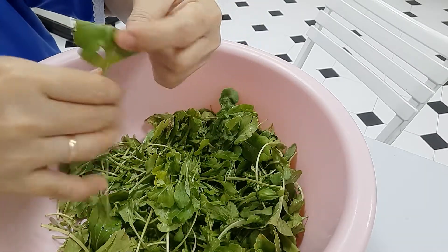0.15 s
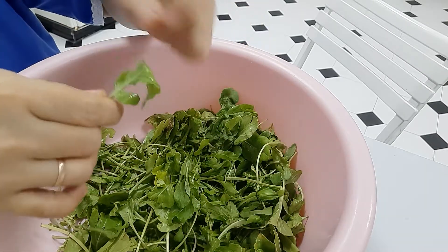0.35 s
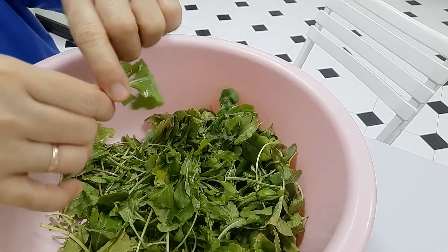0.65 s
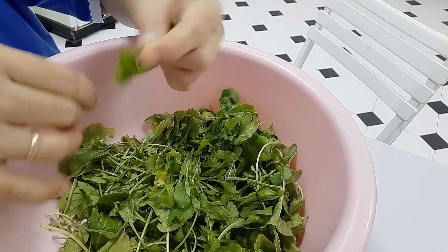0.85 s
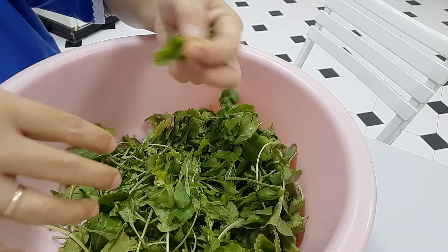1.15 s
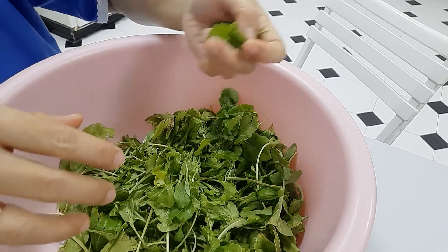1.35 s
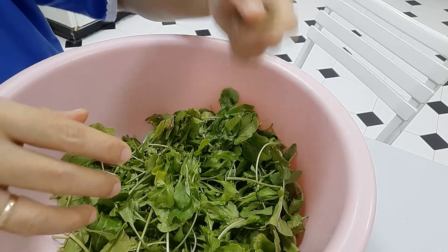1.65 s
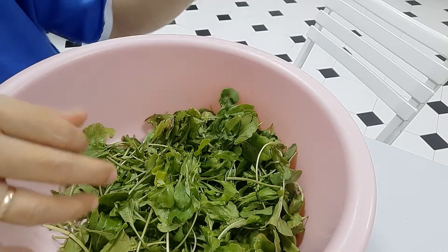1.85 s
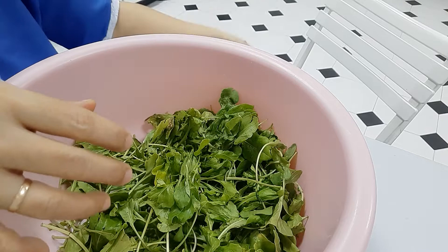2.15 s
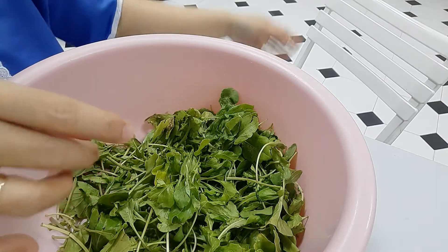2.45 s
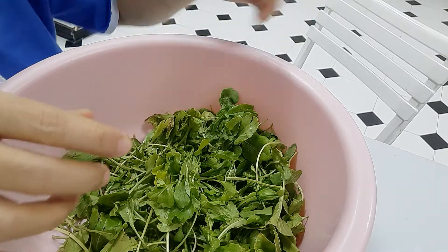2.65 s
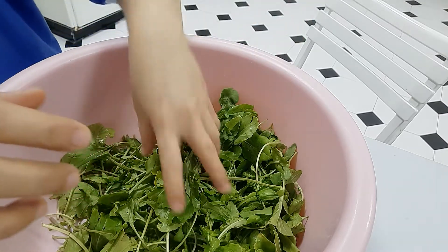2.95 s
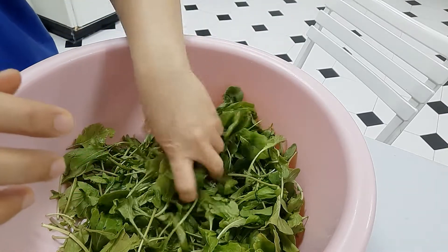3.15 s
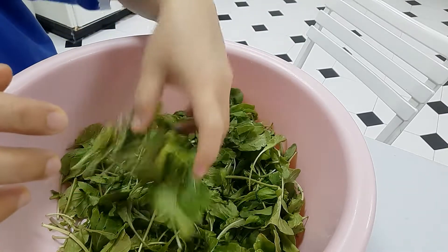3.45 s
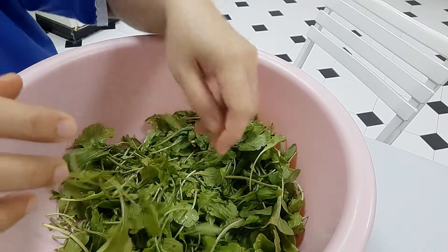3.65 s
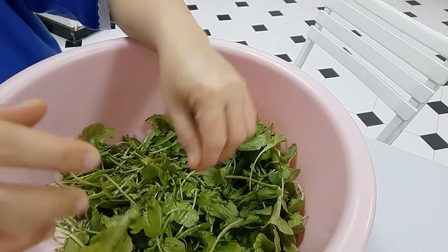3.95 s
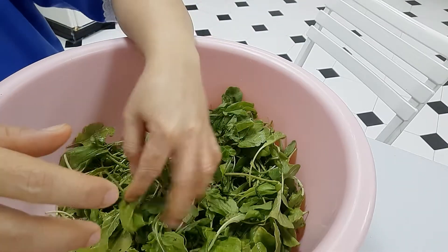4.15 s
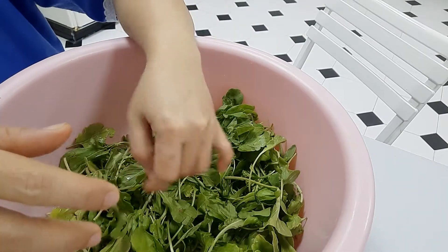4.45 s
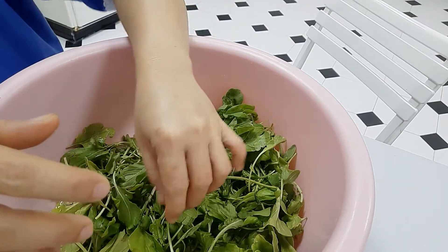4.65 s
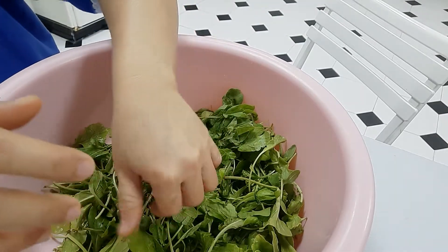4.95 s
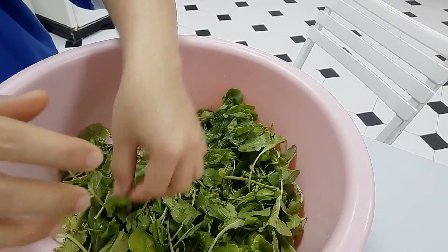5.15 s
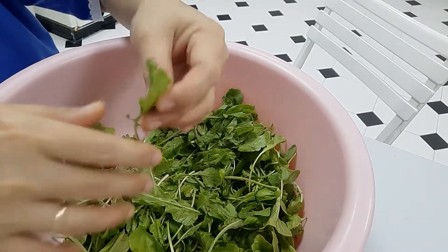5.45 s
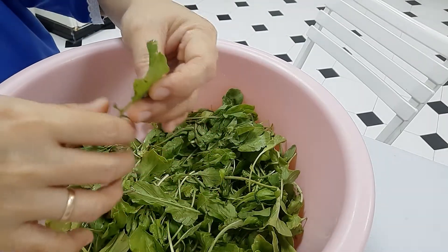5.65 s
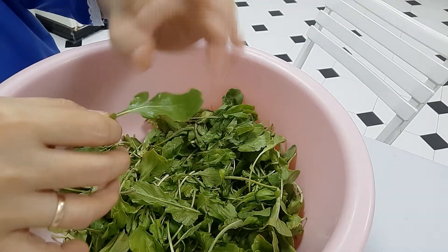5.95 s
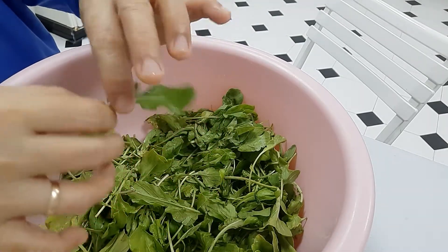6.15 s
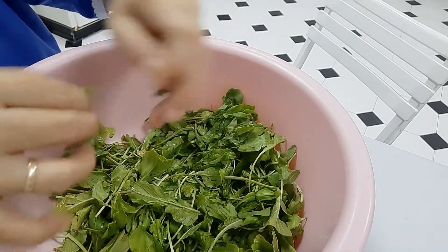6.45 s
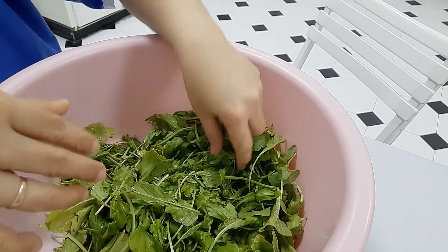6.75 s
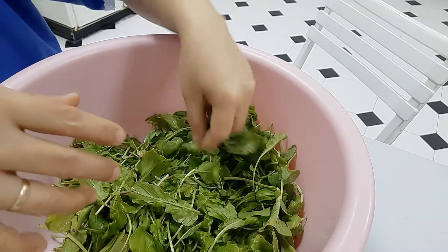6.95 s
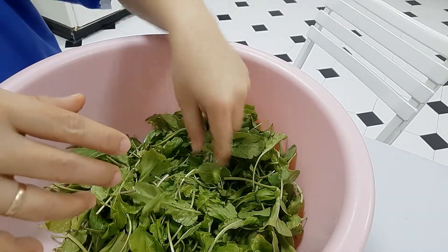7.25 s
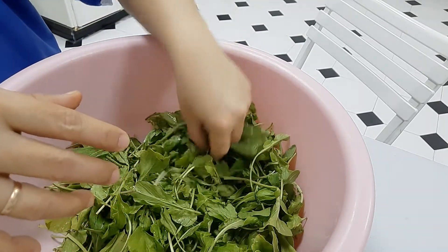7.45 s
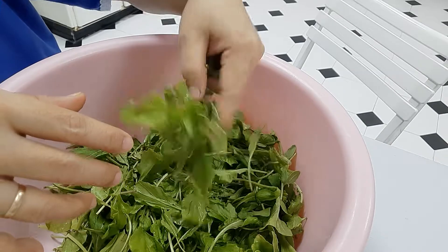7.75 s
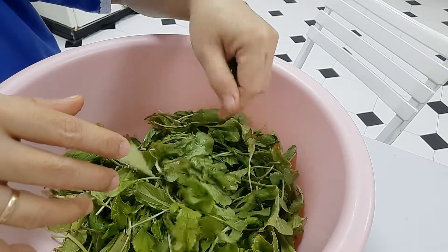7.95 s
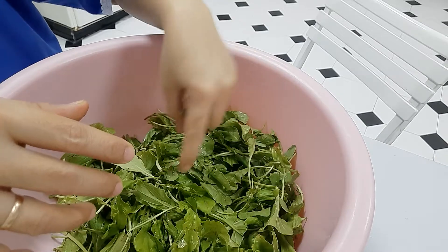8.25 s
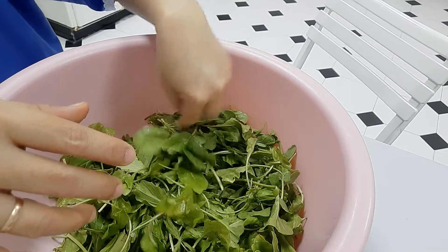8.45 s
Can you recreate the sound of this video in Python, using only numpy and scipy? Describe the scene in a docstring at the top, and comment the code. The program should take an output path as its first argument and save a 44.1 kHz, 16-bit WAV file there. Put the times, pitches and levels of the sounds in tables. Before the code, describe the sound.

A tiled room with short bright echoes, heard by two close microphones, the leaves nearer the left. Throughout, soft street rumble and a deep motor hum swell and sink, with tyre hiss strongest around 2.3-3.1 s. A low engine tone climbs briefly from 0.1 s; another pulls away from 2 to 4.3 s, rising and weakening. Handling is faint at first, with tiny ticks at 0.25 s and one sharp stem break at 0.76 s. From 3 to 3.7 s leaves rustle in a crisp, crackling surge, with another stroke at 4.2 s. At 4.43 s something heavy thuds dully on the floor, with quick weaker bounces to 4.6 s. Only slight rustles and ticks follow, until two loud, bright stem breaks almost together near 6.4 s. A rustle bursts at 6.9 s, then thick strokes with small snaps run from 7.4 to 8 s, and again at 8.4 s, until the end at 8.6 s.

```python
"""From the start a motor hums and street rumble comes into a tiled room: faint noise with swelling bands.
Two engines pull away, one at once and one at 2 s: rising sines. Meanwhile a hand close to two microphones
turns leafy greens in a plastic basin: dense noise grains rustle and crackle, stems snap as short bursts.
The rustle surges at 3 s; at 4.4 s something heavy thuds on the floor, as decaying modes, and bounces.
After a calmer stretch, two stems break loudly at 6.4 s, and the rustle is thick again from 6.9 s."""
import sys
import numpy as np
from scipy import signal
from scipy.io import wavfile
from scipy.ndimage import uniform_filter1d

SR = 44100
rng = np.random.default_rng(int(sys.argv[2]) if len(sys.argv) > 2 else 0)


def unload_audio(sound):
    """Save the sound as a 16-bit wav file, at the path given as the first command line argument."""
    columns = np.transpose(np.atleast_2d(sound))
    # keep every value between -1 and 1, then stretch to whole-number steps
    steps = np.round(np.clip(columns, -1, 1) * 32767)
    wavfile.write(sys.argv[1], SR, steps.astype(np.int16))


N = 379260

# Street spectrum. Each row: frequency in Hz, relative density in dB.
STREET_COLOUR = [(36, -32), (46, 1), (65, -2.5), (190, -8.5), (430, -20), (1150, -26.5), (1450, -32.5),
                 (2900, -49), (3700, -58), (6700, -64), (9800, -58), (10400, -54), (12200, -58),
                 (16000, -56)]
# Resonant humps on the street spectrum. Each row: centre in Hz, width in Hz, height in dB.
STREET_HUMPS = [(71.6, 7.7, 3), (127.5, 2.9, 9), (150.4, 7.5, 2), (190, 7.2, 3), (277.2, 24.4, 8),
                (571, 45, 6.5), (807, 17, 5), (1011, 15, 4), (11450, 90, 12)]
# Passing traffic. Each row: time in seconds, change of rumble in dB, of tyre roar in dB, of tyre hiss in dB.
TRAFFIC_SWELLS = [(0, 0, 3, 1.5), (.8, -0.5, 4, 1), (1.3, 0, 4, 5), (1.8, -0.5, 5, 5), (2.3, 0, 6, 8.5),
                  (2.7, 1, 5.5, 9), (3.1, 1, 5, 9), (3.8, -1, 6, 6), (4.6, 0.5, 5, 3), (5.1, -1.5, 4, 1.5),
                  (5.7, 0, 2, 1), (6.3, 1.5, 4, -1), (7, 0.5, 2.5, 3.5), (7.8, -2, 4.5, 0),
                  (8.6, 0, 4.5, 0)]
# Likeness of the street in both microphones. Each row: frequency in Hz, likeness from 0 to 1.
STREET_LIKENESS = [(60, 0.97), (130, 0.94), (290, 0.77), (640, 0.62), (1400, 0.45), (3000, 0.035),
                   (8000, 0.067), (15000, 0.26)]
# Phase of the street. Each row: frequency in Hz, lead of the left in radians.
STREET_LEFT_LEAD = [(60, .05), (600, 0.32), (1300, 3.07), (2800, 6), (16000, 28.4)]
# Balance of the street. Each row: frequency in Hz, left over right in dB.
STREET_BALANCE = [(60, 2.5), (180, 2.5), (550, 3.5), (1650, 3.5), (4970, 6), (15000, 3.5)]
STREET_DB = -45.5  # rms

# Motor hum swelling and sinking. Each row: time in seconds, tone rms in dB, octave rms in dB.
HUM_LEVELS = [(0, -44.5, -47), (.3, -45.5, -51), (1, -51, -48), (1.3, -46.5, -57), (2.15, -41.5, -47),
              (2.45, -42, -62), (2.8, -49, -47.5), (3.3, -53, -54), (3.7, -43.5, -49.5), (4.3, -43, -49.5),
              (5.1, -48, -61.5), (5.55, -54, -55), (5.8, -40.5, -60), (6.05, -47.5, -52),
              (6.45, -38.5, -46.5), (6.9, -41.5, -54), (7.1, -50.5, -52), (7.35, -55.5, -52.5),
              (7.95, -42.5, -55.5), (8.6, -44, -51.5)]
HUM_HZ = 47.75

# Engines pulling away. Each row: start in seconds, length in seconds, start pitch in Hz, climb in Hz per s,
# starting rms before the fade-in in dB, decline in dB per s.
ENGINE_RUNS = [(.1, .75, 57.6, 6.5, -44, 1), (1.955, 2.4, 53.58, 3.9, -39.5, 3.2)]
ENGINE_FADE_S = 0.16

# Reverberation of the tiled room. Each row: frequency in Hz, time to fall 60 dB in seconds.
ROOM_T60 = [(100, 0.37), (500, 0.69), (2000, 0.94), (5300, 0.51), (10000, 0.51), (15000, 0.4)]

# Modes of the floor. Each row: frequency in Hz, level in dB, time to fall 60 dB in seconds,
# arrival after the blow in seconds, rise time constant in seconds.
FLOOR_MODES = [(85, -20.5, 0.085, .0102, 0.0018), (107.6, -16, 0.18, 0.00195, 0.0071),
               (141, -25, 0.088, 0.0047, .004), (184.4, -16, 0.063, 0.0074, 0.0056),
               (225, -27.5, 0.14, 0.0023, .002), (275, -20, 0.066, 0.0022, 0.0009),
               (350, -30, 0.075, 0.0011, 0.00088), (402, -32, 0.099, 0.00065, 0.0017),
               (484, -29.5, 0.083, 0.00238, 0.00052), (736, -46, 0.079, 0.00092, .001)]
# Blow, second crack and two bounces. Each row: time in seconds, gain of the modes in dB, peak of the crack in dB.
FLOOR_BLOWS = [(4.426, -1, -32), (4.434, -30, -43), (4.4757, -10.5, -57), (4.567, -18.5, -54)]

# Snapping stems and stiff leaves. Each row: time in seconds, fibre level in dB, stem pitch in Hz,
# stem peak in dB, left over right in dB, length of the tear in seconds.
STEM_SNAPS = [(0.235, -59, 3360, -58, 11, 0.0022), (0.251, -61, 6500, -64, 9, 0.003),
              (0.264, -49, 6720, -64, 7, 0.0022), (0.6673, -77, 3360, -72, 7, 0.002),
              (0.7303, -63, 7900, -76, 6, 0.001), (0.7568, -24.5, 7410, -33.5, 2.5, 0.0062),
              (0.9334, -69, 7920, -53, 3, 0.002), (1.0728, -55.5, 3200, -51, 19, 0.0025),
              (1.1114, -67, 2070, -55, 15, 0.0022), (1.1438, -63, 5080, -66, 14, 0.002),
              (1.3555, -66, 2660, -71, 15, 0.0019), (1.7905, -75, 3830, -68, 7, 0.003),
              (3.1725, -52, 1720, -59, 9, 0.0021), (3.1843, -58, 5130, -48, 4, 0.002),
              (3.2385, -42, 6000, -43, 4, 0.0016), (3.481, -61, 3760, -48, 13, 0.0022),
              (3.5462, -58, 7640, -46, 12, 0.002), (3.6505, -65, 3530, -53, 12, 0.002),
              (4.216, -47.5, 1880, -50, 15, 0.0021), (5.262, -73, 7894, -70, 8, 0.002),
              (5.2738, -73, 5770, -56, 12, 0.0025), (5.288, -69, 7010, -70, 6, 0.0026),
              (5.8571, -73, 6970, -59, 15, 0.0028), (5.873, -75, 5700, -58.5, 18, 0.004),
              (5.884, -75, 5513, -66, 8, 0.004), (6.2852, -62, 7920, -71, 5, 0.0016),
              (6.3055, -64, 1700, -66, 7, 0.002), (6.373, -27, 8400, -33.5, 8, 0.0035),
              (6.395, -27.5, 6600, -37.5, 3, 0.006), (6.5878, -79, 5900, -56.5, 15, 0.0028),
              (6.705, -62, 1727, -68, 6, 0.0026), (6.8616, -58, 2760, -58, 11, 0.0024),
              (6.877, -46, 7100, -53, 11, 0.0026), (6.884, -47, 9000, -56, 10, 0.002),
              (7.0993, -66, 2400, -71, 16, 0.002), (7.251, -72, 2070, -67, 12, 0.0024),
              (7.428, -52, 1720, -49, 15, 0.002), (7.453, -46, 7400, -59, 10, 0.0049),
              (7.4573, -45, 7090, -46, 8, 0.0017), (7.4743, -40, 7080, -47, 4, 0.0026),
              (7.6059, -64, 3450, -51, 15, 0.0023), (7.699, -70, 1870, -51.5, 23, 0.0019),
              (7.7046, -72, 2000, -57, 10, 0.0024), (7.922, -56, 2150, -50, 14, 0.0022),
              (7.9414, -52, 2760, -52, 16, 0.002), (7.954, -61, 6230, -47, 2, 0.0023),
              (8.0086, -67, 3936, -52, 13, 0.0021), (8.3774, -48, 6800, -58, 14, 0.0013)]
# Fibre spectrum of whole stems breaking. Each row: frequency in Hz, relative density in dB.
BREAK_COLOUR = [(1000, -26), (2000, -20), (3800, -33), (5000, -32), (7340, -26), (9320, -15), (10600, -11),
                (11700, -9), (13700, -2.5), (16000, -8.5)]
# Fibre spectrum of lighter snaps. Each row: frequency in Hz, relative density in dB.
TICK_COLOUR = [(1500, -34), (4000, -14), (7000, -4), (10000, -4), (13000, 1), (16000, -12.5)]
STEM_BREAK_DB = -35  # fibres above this: a whole stem breaks
BOUNCE_S, BOUNCE_DB = 0.015, -26  # first echo of the snaps from the tiles

# Strokes of the hand in the leaves. Each row: peak time in seconds, peak level in dB, rise in seconds,
# fade in seconds, brightness in dB, left over right in dB.
HAND_STROKES = [(.238, -66, .008, .06, -6, 6), (.266, -66, .04, 0.18, -2, 7),
                (1.072, -65, .01, 0.28, -0.5, 3.5), (1.36, -81.5, 0.11, 0.81, 6.5, 3),
                (1.56, -80, 0.22, 0.16, 3, 7), (1.8, -76.5, .15, 0.38, 4, 7),
                (2.2, -78.5, 0.75, 0.24, -2, 2), (2.34, -67, 0.12, 0.37, 1.5, 1),
                (2.9, -79.5, 1.7, 1.1, -16, 3), (3.11, -52, 0.12, 0.38, 1.5, 4),
                (3.19, -60, 0.079, 0.22, 6, -2), (3.3, -56.5, 0.1, 0.14, 0, 1),
                (3.39, -61, 0.17, 0.16, 5, 3), (3.49, -62, 0.058, .06, -15, -2),
                (3.575, -52, 0.11, 0.2, -1, 4), (4.15, -75.5, .05, .8, -2, 6),
                (4.224, -54.5, 0.029, 0.27, 3, 3), (4.3, -63.5, .1, .2, -3, 2),
                (4.44, -65.5, .05, 0.28, -6, 0), (4.764, -84, .3, 0.18, 8.5, 3),
                (5.12, -80, .08, 1.1, 0, 3), (5.277, -68, 0.054, 0.099, 0, 5.5),
                (5.419, -78, .1, 0.075, 4.5, 3.5), (5.865, -72.5, 0.061, .25, -1, 1),
                (6.585, -74, 0.21, .15, 5, 3), (6.75, -80.5, 0.98, .9, 3.5, 3),
                (6.882, -55, 0.063, .08, -0.5, 5), (6.915, -60.5, 0.043, 0.061, 4.5, 6),
                (7.12, -76, 0.045, 0.12, 12, 5), (7.27, -80.5, 0.091, 0.11, 13, 4),
                (7.42, -55.5, 0.13, 0.11, 2.5, 4.5), (7.485, -57.5, 0.11, .4, -2, 3.5),
                (7.6, -61.5, .2, 0.31, 2, 4), (7.74, -69, .15, 0.071, 2, 4), (7.9, -59, 0.22, 0.21, 5, 4.5),
                (7.95, -59, 0.11, .07, -7, 3), (8.01, -65, .02, 0.078, -3, 2),
                (8.391, -56.5, 0.053, 0.22, 3, 3.5), (8.52, -69, 0.14, 0.25, 1, 4)]
STROKE_SWING_DB = 30  # climb within the rise, drop within the fade
SETTLING_DB = -89.5  # the heap keeps settling faintly between strokes
# Leaf spectrum. Each row: frequency in Hz, relative density in dB.
LEAF_COLOUR = [(500, -14), (1000, -7.5), (1600, -8), (2500, -13), (4000, -14.5), (6000, -14.5), (9000, -15),
               (12000, -17), (14000, -17), (16000, -25)]
# Parts of the heap. Each entry: delay to the right microphone in seconds.
HEAP_GAPS_S = [0.00017, .00026, .00042]

MIC_GAP_S = 0.00025  # sound from the left reaches the right microphone later
SHADE_DB = -14.5  # the right microphone faces away: top treble loss of leaves and snaps
EDGE_HZ = 15800


def amp(db):
    """Decibels to amplitude."""
    return 10 ** (np.asarray(db) / 20)


def evened(x):
    """Scales to unit rms."""
    return x / np.sqrt(np.mean(x ** 2) + 1e-20)


def read(points, hz):
    """Value of a frequency table at hz, interpolated over log frequency."""
    f, value = np.transpose(points)
    return np.interp(np.log(hz + 1), np.log(f + 1), value)


def follow(rows, t):
    """Columns of a time table at the times t."""
    s, *columns = np.transpose(rows)
    return [np.interp(t, s, c) for c in columns]


def colour(x, points):
    """Causal minimum-phase filter of unit energy with the given spectrum."""
    db = np.maximum(read(points, abs(np.fft.fftfreq(4096, 1 / SR))), -100)
    phase = -signal.hilbert(db * np.log(10) / 20).imag
    kernel = np.fft.ifft(amp(db) * np.exp(1j * phase)).real[:2048]
    return signal.oaconvolve(x, kernel[None] / np.linalg.norm(kernel), axes=1)[:, :N]


def band(x, low_hz, high_hz):
    """Band-pass."""
    return signal.sosfilt(signal.butter(2, [low_hz, high_hz], "bandpass", fs=SR, output="sos"), x)


def tilt(x, bright_db, split_hz):
    """Raises or lowers what lies above the split."""
    low = signal.sosfilt(signal.butter(2, split_hz, fs=SR, output="sos"), x)
    return low + amp(bright_db) * (x - low)


def placed(x, pan_db, gap_s=MIC_GAP_S):
    """Two microphones: a level difference and a later arrival on the right."""
    late = np.concatenate([np.zeros(round(gap_s * SR)), x])[:len(x)]
    return np.array([x * amp(pan_db / 2), late * amp(-pan_db / 2)])


def street():
    """Random short-time spectra: rumble, tyre roar and hiss swell apart, over fixed humps."""
    frames, hz = N // 1024 + 5, np.fft.rfftfreq(4096, 1 / SR)
    a, b, c, d, patches = rng.standard_normal((frames, 2049, 5)).T
    patches = evened(uniform_filter1d(uniform_filter1d(patches, size=30, axis=0), size=4, axis=1))

    rumble_db, roar_db, hiss_db = follow(TRAFFIC_SWELLS, np.arange(frames) * 1024 / SR)
    rumble = 1 / (1 + (hz / 700) ** 2)[:, None]
    roar = np.exp(-.5 * (np.log((hz + 1) / 1500) / 0.9) ** 2)[:, None]
    hiss = np.exp(-.5 * (np.log((hz + 1) / 3100) / 0.31) ** 2)[:, None]
    traffic_db = rumble * rumble_db + roar * roar_db + hiss * hiss_db
    humps_db = sum(db / (1 + (2 * (hz - f) / width) ** 2) for f, width, db in STREET_HUMPS)
    field_db = (read(STREET_COLOUR, hz) + humps_db)[:, None] + traffic_db + 1.13 * patches

    same = np.clip(read(STREET_LIKENESS, hz), 0, 1)[:, None]
    lag = np.exp(-1j * read(STREET_LEFT_LEAD, hz))[:, None]
    left = a + 1j * b
    right = (same * left + np.sqrt(1 - same ** 2) * (c + 1j * d)) * lag
    lean = amp(read(STREET_BALANCE, hz) / 2)[:, None]
    z = np.array([left * lean, right / lean]) * amp(field_db)
    noise = signal.istft(z, nperseg=4096, noverlap=3072)[1][:, :N]
    return amp(STREET_DB) * evened(noise)


def hum():
    """A motor's steady tone with its octave, each with its own swell."""
    t = np.arange(N) / SR
    db, octave_db = follow(HUM_LEVELS, t)
    turn = 2 * np.pi * HUM_HZ * t
    return np.sqrt(2) * (amp(db) * np.sin(turn) + amp(octave_db) * np.sin(2 * turn + 1))


def engines():
    """The firing tone of each engine climbs steadily and weakens as it speeds up and draws away."""
    out = np.zeros(N)
    for start_s, length_s, start_hz, climb_hz_per_s, db, decline_db_per_s in ENGINE_RUNS:
        u = np.arange(N) / SR - start_s
        fade = np.clip(np.minimum(u, length_s - u) / ENGINE_FADE_S, 0, 1)
        tone = np.sin(2 * np.pi * (start_hz * u + climb_hz_per_s * u ** 2 / 2))
        out += np.sqrt(2) * fade * amp(db - decline_db_per_s * u) * tone
    return out


def room(x):
    """Sparse echoes of random sign, each band dying at its own speed, others for each microphone."""
    taps = np.zeros((2, SR))
    slots = np.arange(260, SR - 20, 20)  # samples
    at = slots + rng.integers(0, 20, (2, len(slots)))
    np.put_along_axis(taps, at, rng.choice([-1., 1.], at.shape), 1)
    hz, t, z = signal.stft(taps, SR, nperseg=512)
    decay = amp(-60 * t / read(ROOM_T60, hz)[:, None])
    tail = signal.istft(z * decay, SR, nperseg=512)[1]
    return signal.fftconvolve(x, tail / np.linalg.norm(tail[0]), axes=1)[:, :N]


def thud():
    """Dull blows: short cracks, then floor modes, the deepest late; deep modes lie nearer the middle."""
    out, grit = np.zeros((2, N)), rng.standard_normal(N)
    for blow_s, body_db, crack_db in FLOOR_BLOWS:
        t = np.arange(N) / SR - blow_s
        burst = grit * (t > 0) * np.exp(-abs(t) / 0.0047)
        crack = band(band(burst, 820, 2760), 820, 2760)
        out += placed(amp(crack_db) * crack / abs(crack).max(), 15.2)
        for hz, db, t60_s, after_s, rise_s in FLOOR_MODES:
            u = np.maximum(t - after_s, 0)
            envelope = amp(body_db + db - 60 * u / t60_s) * (1 - np.exp(-u / rise_s))
            out += placed(envelope * np.sin(2 * np.pi * hz * u), 1.3 * np.log2(hz / 45))
    return out


def snaps():
    """Bright tearing fibres over a stem's duller tick; returns the near sound and the crack fed to the room."""
    t = np.arange(900) / SR
    # bright and cracks: first axis is light snap or stem break
    bright, cracks = np.zeros((2, 2, N + 900)), np.zeros((2, 2, N + 900))
    dull = np.zeros((2, N + 900))
    fibres = rng.standard_normal((len(STEM_SNAPS), 4, 900))
    for (s, db, hz, stem_db, pan_db, tear_s), noise in zip(STEM_SNAPS, fibres):
        start, kind = round(s * SR), int(db > STEM_BREAK_DB)
        now = slice(start, start + len(t))
        shape = np.exp(-(t / max(tear_s, 2e-4)) ** 3) * (0.84 + 0.1 * np.exp(-t / 0.00083))
        # the basin wall sends each side its own echoes
        scattered = noise[1:3] * amp([[pan_db / 2], [-pan_db / 2]]) * shape
        direct = placed(noise[0] * shape, pan_db)
        bright[kind, :, now] += amp(db) * (0.57 * direct + 0.77 * scattered)
        tick = band(noise[3] * shape, hz / 1.26, hz * 1.47)
        dull[:, now] += amp(stem_db) * placed(tick / abs(tick).max(), pan_db)
        cracks[kind, :, start] += amp(db) * np.linalg.norm(shape)  # one pulse scaled to the tear's energy
    # the dull ticks go into the room too
    near, far = (colour(x[0], TICK_COLOUR) + colour(x[1], BREAK_COLOUR) + dull[:, :N]
                 for x in (bright, cracks))
    return near, far


def hand():
    """Level, brightness and side of the rustle: strokes add in power, so the loudest sets colour and side."""
    t = np.arange(0, N + 32, 32) / SR
    peak_s, db, rise_s, fade_s, bright_db, pan_db = np.transpose(HAND_STROKES)[:, :, None]
    away = np.where(t < peak_s, (peak_s - t) / abs(rise_s), (t - peak_s) / abs(fade_s))
    power = amp(db - STROKE_SWING_DB * np.minimum(away, 5)) ** 2
    total = power.sum(0) + amp(SETTLING_DB) ** 2
    bright = (power * bright_db).sum(0) / total
    pan = (power * pan_db).sum(0) / total
    rows = np.transpose([t, 10 * np.log10(total), bright, pan])
    return follow(rows, np.arange(N) / SR)


def patchy(x, patchy_db):
    """Different leaves move from moment to moment: short patches of the spectrum swell and sink."""
    z = signal.stft(x, nperseg=256)[2]
    patches = rng.standard_normal(z.shape[1:])
    patches = uniform_filter1d(uniform_filter1d(patches, size=14, axis=0), size=6, axis=1)
    return signal.istft(z * amp(patchy_db * evened(patches)), nperseg=256)[1][:, :N]


def rustle():
    """Countless tiny slips of leaf on leaf, spread over the heap, in clumps, with short pitched crackles."""
    db, bright_db, pan_db = hand()
    clumps = evened(uniform_filter1d(rng.standard_normal(N), size=300))
    slips = rng.standard_normal((3, N)) * amp(1.6 * clumps)
    crackles, t = np.zeros((3, N)), np.arange(120) / SR
    for k, hz in enumerate(np.geomspace(1800, 15000, num=12)):  # small leaves crackle higher
        sizes = amp(4.5 * np.minimum(rng.exponential(1, N), 3))
        sizes = sizes * (rng.random(N) < 30 / SR)  # about 30 per second at each pitch
        ping = np.sin(2 * np.pi * hz * t) * np.exp(-t * hz / 1.5)
        crackles[k % 3] += signal.oaconvolve(sizes, ping)[:N]
    mixed = patchy(evened(slips) + 0.27 * evened(crackles), patchy_db=2.0)
    grain = tilt(colour(evened(mixed), LEAF_COLOUR), bright_db, 9500) * amp(db)
    return 0.9 * sum(placed(part, pan_db, gap_s) for part, gap_s in zip(grain, HEAP_GAPS_S))


def scene():
    """Street and tones, the thud, leaves and snaps, and the room's echoes of the indoor blows and leaves."""
    leaves, (stems, cracks), blow = rustle(), snaps(), thud()
    bounce = amp(BOUNCE_DB) * np.roll(stems, round(BOUNCE_S * SR), axis=1)
    near = leaves + stems + bounce
    near = np.array([near[0], tilt(near[1], SHADE_DB, 11400)])
    tones = placed(hum() + engines(), 0.9, gap_s=.0005)
    echoes = room(amp(-8.5) * leaves + amp(-8.0) * tilt(cracks, -1.5, 9800) + amp(-10) * blow)
    return near + blow + echoes + street() + tones


def record(dry):
    """Band limit: a steep linear-phase low-pass."""
    kernel = signal.firwin(1023, EDGE_HZ, window=("kaiser", 9), fs=SR)
    return signal.oaconvolve(dry, kernel[None], "same")


dry = scene()
out = record(dry)
unload_audio(out)
```